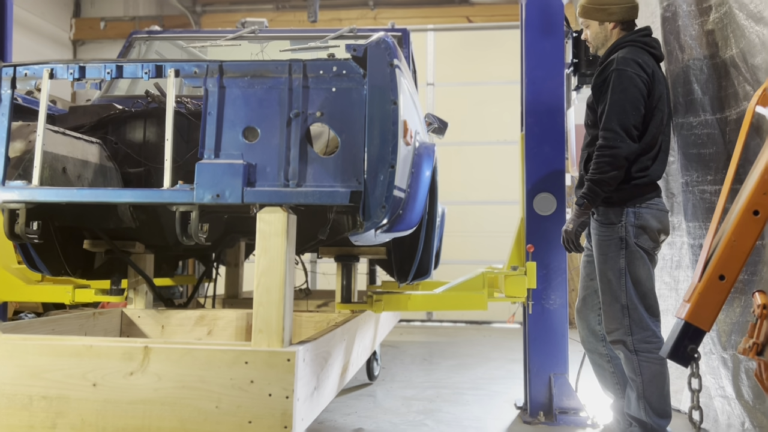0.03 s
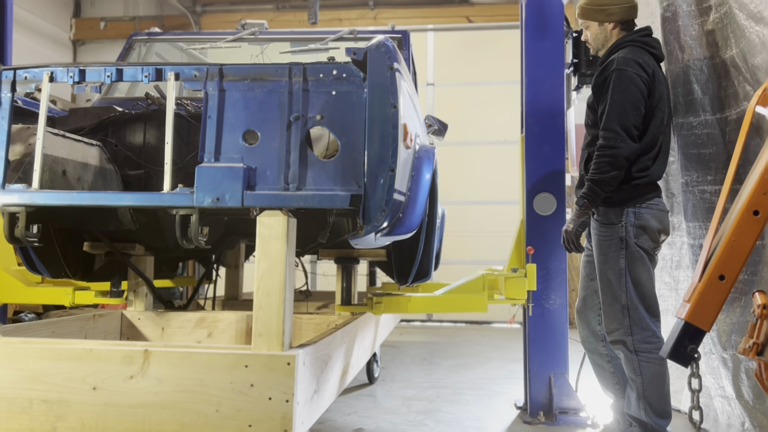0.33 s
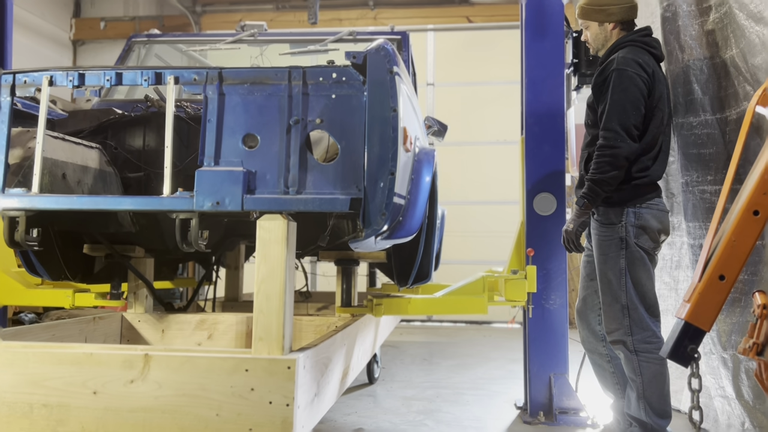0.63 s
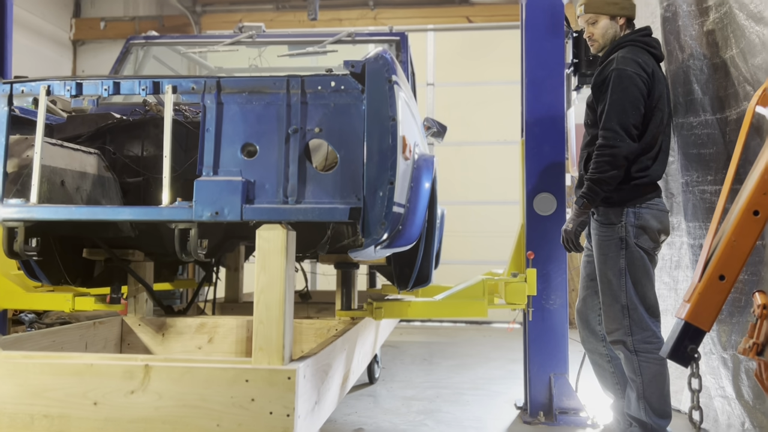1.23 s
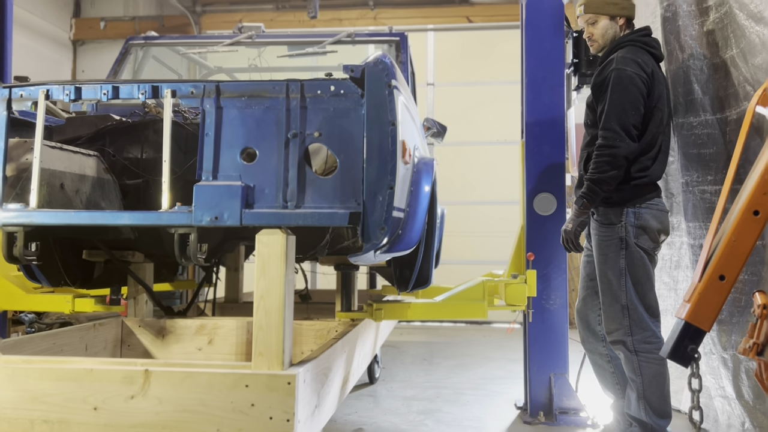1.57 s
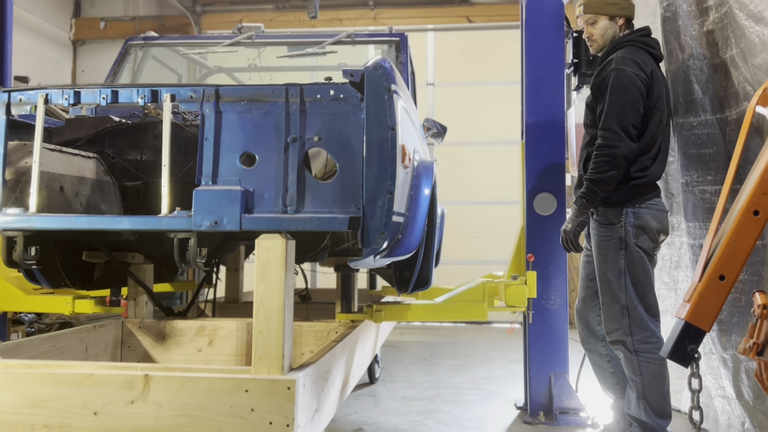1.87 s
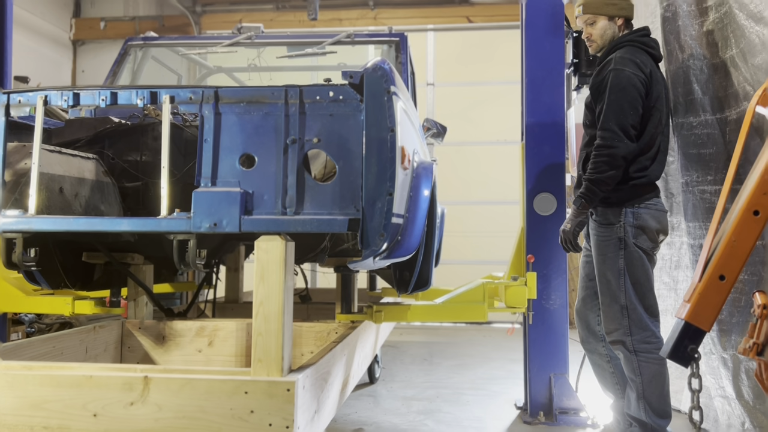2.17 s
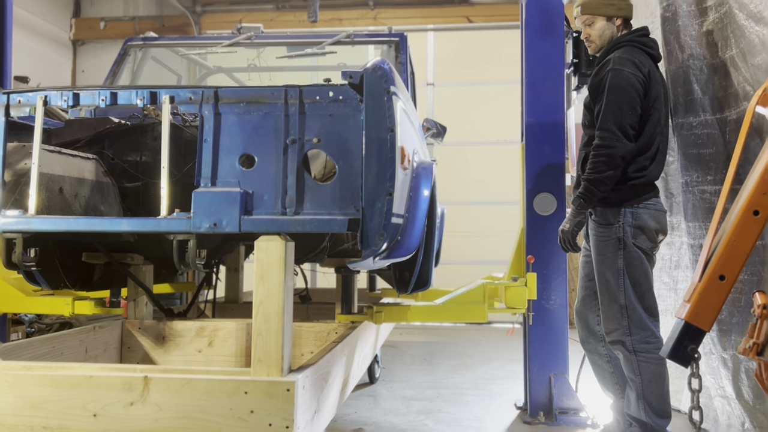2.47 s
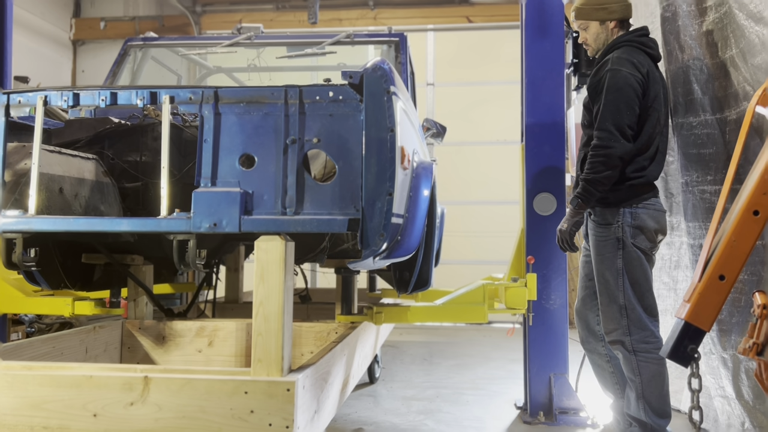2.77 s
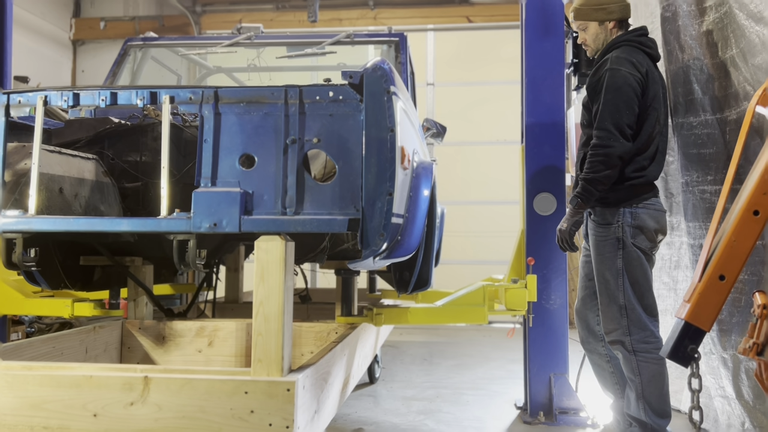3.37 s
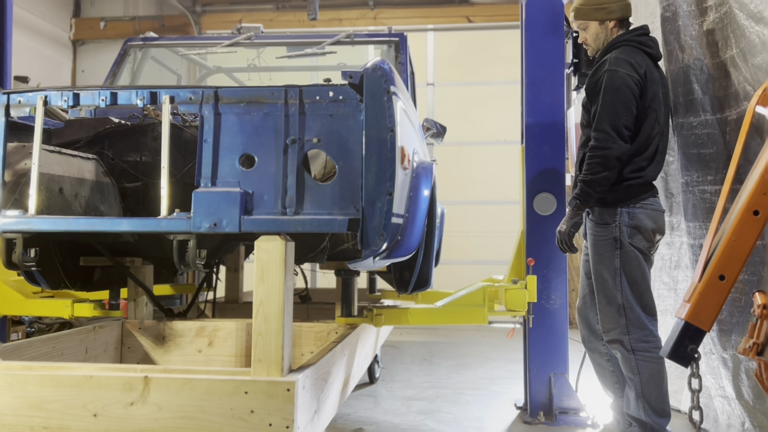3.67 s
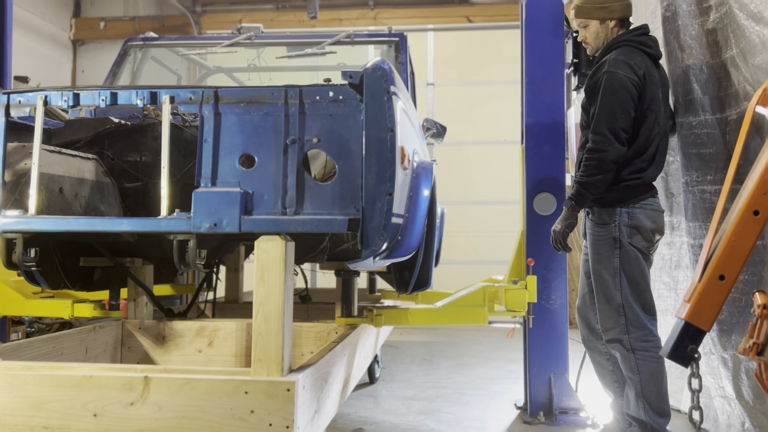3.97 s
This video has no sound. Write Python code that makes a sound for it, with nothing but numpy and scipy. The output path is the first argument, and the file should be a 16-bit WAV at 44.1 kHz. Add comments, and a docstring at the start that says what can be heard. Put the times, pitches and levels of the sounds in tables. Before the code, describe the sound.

Hollow metal knocks ring from a car shell shifting on its supports, mixed with timber creaks and small ticks. It lands on a wooden cart with two thumps over a low workshop rumble, before one sharp, nearby snap.

```python
"""Sharp steel knocks open the scene: a stripped car body, lowered on a workshop lift, slips on its
supports, and each impact excites the modes of its shell. The wooden cart beneath groans by stick-slip
friction and takes the weight in two dull thumps, the second with a rebound. Small fittings tick,
the shell creaks and the floor rumbles. Near the end something snaps close by, and the workshop rings on."""
import sys
import numpy as np
from scipy import signal
from scipy.fft import rfft, irfft, next_fast_len
from scipy.io import wavfile
from scipy.ndimage import uniform_filter1d

SR = 44100
rng = np.random.default_rng(int(sys.argv[2]) if len(sys.argv) > 2 else 0)


def digitize_waveform(pressure):
    """Quantize a signal to 16-bit integers and store it at the path in sys.argv[1].

    Rows of a 2-D input are taken as channels; values are limited to [-1, 1].
    """
    field = np.atleast_2d(pressure).T
    bounded = np.clip(field, -1, 1)
    quanta = np.round(bounded * 32767).astype(np.int16)
    wavfile.write(sys.argv[1], SR, quanta)


N = 176400
TIME = np.arange(N) / SR
RING_TIME = TIME[:SR]  # the one second given to each event

# spectral envelope of the steel shell's dense modes (frequency [Hz], relative level [dB])
SHELL_SPECTRUM = [(40, -36), (110, -13.5), (180, -0.5), (270, 1), (360, -1.5), (550, -0.5), (900, -6.5),
                  (1250, -10), (1420, -13), (1660, -16.5), (1850, -20), (2300, -24.5), (3300, -38.5),
                  (6000, -47.5), (11000, -58), (16000, -73)]


def amp(db):
    """Amplitude ratio of a level in decibels."""
    return 10 ** (np.asarray(db) / 20)


def unit(x):
    """Normalisation to unit RMS."""
    return x / np.sqrt(np.mean(x ** 2))


def decay(t60):
    """Exponential damping: 60 dB down after t60 seconds."""
    return np.exp(-np.log(1000) * RING_TIME / max(t60, 1e-3))


def rise(tau_s):
    """Exponential approach to full amplitude."""
    return 1 - np.exp(-RING_TIME / tau_s)


def envelope(points):
    """Amplitude envelope interpolated from (time [s], level [dB]) points."""
    return amp(np.interp(TIME, *np.array(points).T))


def add(out, start_s, x):
    """Superposition of x on out from start_s on."""
    i = max(int(start_s * SR), 0)
    out[i:i + len(x)] += x[:max(N - i, 0)]


def over_hz(points, hz):
    """Interpolation of (frequency [Hz], value) points on a logarithmic axis."""
    freqs, values = np.array(points, float).T
    return np.interp(np.log(hz + 1e-3), np.log(freqs), values)


def colour(x, spectrum, *tones):
    """Minimum-phase filtering by a spectrum scaled to unit power, times any further tone curves."""
    n = next_fast_len(len(x) + SR // 10, True) // 2 * 2
    hz = np.arange(n // 2 + 1) * SR / n
    gain = unit(amp(over_hz(spectrum, hz))) * amp(sum(over_hz(tone, hz) for tone in tones))
    cepstrum = irfft(np.log(gain))
    cepstrum[1:n // 2] *= 2  # folding onto positive time makes the filter causal
    cepstrum[n // 2 + 1:] = 0
    return irfft(rfft(x, n) * np.exp(rfft(cepstrum)))[:len(x)]


def whiten(x, width_hz):
    """Spectral whitening evens out the energy of a one-second response; its end is faded out."""
    spectrum = rfft(x)
    power = uniform_filter1d(abs(spectrum) ** 2, width_hz)
    return irfft(spectrum * np.sqrt(power.mean() / power)) * np.clip(4 - 5 * RING_TIME, 0, 1)


def resonate(x, hz, width):
    """Band-pass resonance; width is the approximate fractional bandwidth."""
    edges = np.clip([hz / (1 + width / 2), hz * (1 + width / 2)], 1, SR / 2 - 1)
    return signal.sosfilt(signal.butter(2, edges, "band", fs=SR, output="sos"), x)


def clatter(t60):
    """Modal overlap: countless crowded modes die away together as noise."""
    return whiten(rng.standard_normal(SR) * decay(t60), width_hz=121)


def modes(rows, scatter=0):
    """Free vibration as a sum of damped sines, with random phases of up to scatter cycles."""
    return sum(amp(db) * decay(t60) * np.sin(2 * np.pi * (hz * RING_TIME + scatter * rng.random()))
               for hz, db, t60 in rows)


def contact_tone(bass_db, treble_db):
    """Excitation spectrum of a contact: heavy ones bring out the bass, hard ones the treble."""
    return [(230, bass_db), (420, bass_db * 0.2), (760, 0.0092), (1150, treble_db * 0.38),
            (2300, treble_db), (9000, treble_db * 0.54), (13000, 0)]


def background():
    """Filtered noise gives floor rumble and still air; the loaded cart sways in one brief oscillation."""
    # spectra of floor and air (frequency [Hz], relative level [dB])
    floor_spectrum = [(10, -5.5), (24, 4), (45, -5.5), (68, -1.5), (100, -10), (150, -10.5), (260, -31),
                      (1000, -54.5)]
    air_spectrum = [(30, 2), (200, 10.5), (600, 10), (1500, 0.5), (3000, -1.5), (6000, -6), (9500, -6.5),
                    (12000, -9), (16000, -15.5)]
    # their envelopes (time [s], level [dB])
    floor_levels = [(0, -62.5), (.6, -53), (.9, -56), (1.3, -50), (1.99, -61.5), (2.09, -46), (2.35, -49.5),
                    (2.7, -50), (3.0, -56), (3.5, -60.5), (4, -55.5)]
    air_levels = [(0, -69.5), (1.2, -69), (1.8, -71.5), (3.6, -72.5), (4, -69)]
    sway_start_s, sway_length_s, sway_hz = 2.024, 0.19, 25
    out = colour(rng.standard_normal(N), floor_spectrum) * envelope(floor_levels)
    out += colour(rng.standard_normal(N), air_spectrum) * envelope(air_levels)
    swell = np.sin(np.pi * np.clip(RING_TIME / sway_length_s, 0, 1))
    add(out, sway_start_s, amp(-37) * np.sin(2 * np.pi * sway_hz * RING_TIME) * swell)
    return out


def workshop_reverb(x):
    """Reverberation: dense early reflections, then a diffuse tail that dies fastest in the top treble."""
    # reverberation time by band (frequency [Hz], t60 [s])
    bands = [(60, 0.6), (250, 0.97), (1000, 0.49), (2500, 0.94), (6000, .5), (14000, 0.12)]
    noise_spectrum, hz = rfft(rng.standard_normal(SR)), np.arange(SR // 2 + 1)
    response = amp(0.5) * rng.standard_normal(SR) * decay(0.28)  # early reflections
    for centre_hz, t60 in bands:
        share = over_hz([(f, f == centre_hz) for f, _ in bands], hz)
        response += irfft(noise_spectrum * share) * decay(t60)
    response = whiten(response * rise(0.004), width_hz=61)
    return signal.fftconvolve(x, response / np.sqrt(np.sum(response ** 2)))[:N]


def shell_creaking():
    """Tiny slips, a Poisson train of impulses, excite the shell while the load shifts."""
    # envelope of the creaking (time [s], level [dB])
    levels = [(0, -60), (.7, -48), (.95, -62), (1.15, -52), (1.45, -55), (1.7, -55.5), (1.85, -68),
              (2.0, -65), (2.15, -45.5), (2.45, -45.5), (2.75, -60), (3.1, -58.5), (3.45, -77.5),
              (3.8, -74.5), (4, -50)]
    slips_per_s = 160
    chance, size = rng.random(N), rng.standard_normal(N)
    slips = (chance < slips_per_s / SR) * (np.sign(size) + 0.33 * size)
    ringing = signal.fftconvolve(slips, clatter(0.11))[:N]
    creak = colour(ringing, SHELL_SPECTRUM, contact_tone(bass_db=6, treble_db=-7.5))
    return unit(creak) * envelope(levels)


def fitting_ticks():
    """Loose fittings tick and ping at high, damped resonances; returns direct sound and room feed."""
    # metal ticks (time [s], level [dB], centre [Hz], t60 [s], room feed [dB])
    ticks = [(0.504, -71.5, 9100, 0.26, -10), (.957, -69, 8200, 0.044, -3), (1.001, -71.5, 8600, 0.13, 4),
             (1.033, -67, 3340, 0.4, -8), (1.236, -53.5, 2980, 0.062, -8), (1.385, -57, 3770, .1, 0),
             (1.386, -56, 7900, 0.03, -2), (2.042, -69, 7900, 0.044, 0), (2.081, -67, 6130, 0.081, -10),
             (2.16, -41.5, 2780, 0.041, -21), (2.297, -66, 3800, 0.38, 5), (2.36, -54, 6600, .02, -6.5),
             (2.463, -60.5, 6500, 0.031, 2.5), (2.485, -69, 8800, 0.055, -2.5),
             (2.945, -71.5, 2580, 0.22, 0.5), (3.909, -50, 3300, .025, -6), (3.93, -56, 3500, .03, -8)]
    # modes of the fitting that pings (frequency [Hz], relative level [dB], t60 [s])
    ping_modes = [(5350, -2, 0.11), (5840, -6, 0.088), (7960, 0, 0.099), (8920, -3, 0.093),
                  (9250, -5, 0.11), (9460, 0, .16)]
    ping_s = 2.162
    direct, to_room = np.zeros(N), np.zeros(N)
    for start_s, db, hz, t60, room_db in ticks:
        tick = amp(db) * unit(resonate(rng.standard_normal(SR), hz, width=0.47)) * decay(t60)
        add(direct, start_s, tick)
        add(to_room, start_s, amp(room_db) * tick)
    ping_rms = amp(-55) * np.sqrt(np.mean(decay(0.18) ** 2))
    ping = ping_rms * unit(signal.fftconvolve(modes(ping_modes), clatter(0.014))[:SR])
    add(direct, ping_s, ping)
    add(to_room, ping_s, amp(-21) * ping)
    return direct, to_room


def timber_groans():
    """Stick-slip friction: uneven pulses drive one resonance of the timber for a moment."""
    # groans (time [s], duration [s], pitch [Hz], level [dB])
    groans = [(.392, 0.021, 813, -53.5), (.47, 0.2, 239.5, -53), (.55, .17, 142, -54),
              (.683, .045, 540.5, -45), (.69, 0.17, 234, -52.5), (1.15, 0.073, 277.5, -56),
              (1.517, 0.088, 559.8, -45.5), (1.572, 0.09, 272.4, -49), (1.58, 0.19, 540, -54.5),
              (1.50, 0.25, 202.8, -53.5), (2.06, 0.16, 193.4, -46), (2.219, .03, 784, -39.5),
              (2.416, 0.076, 887, -52), (2.595, 0.099, 192, -45.5), (2.616, 0.033, 1610, -60)]
    rate_jitter, scatter_db = 0.13, 3.5
    out = np.zeros(N)
    for start_s, length_s, hz, db in groans:
        unsteady = unit(uniform_filter1d(rng.standard_normal(SR), size=60))
        cycles = np.cumsum(hz * (1 + rate_jitter * unsteady)) / SR
        slips = np.diff(np.floor(cycles), prepend=0)  # one pulse a cycle
        slips *= amp(scatter_db * rng.standard_normal(SR))
        swell = np.sin(np.pi * np.clip(RING_TIME / length_s, 0, 1) ** 0.62)
        add(out, start_s, amp(db) * unit(resonate(slips, hz, width=0.34)) * swell)
    return out


def close_snap():
    """Two transients close by: a hard, heavily damped click, then a hollow thud that decays more slowly."""
    # spectra of click and thud (frequency [Hz], relative level [dB])
    click_spectrum = [(300, -18), (1000, -31), (2200, 4.5), (2800, -4), (3400, 3), (4100, -7.5),
                      (5300, 1.5), (6200, -6.5), (6700, 0.5), (7300, -15), (7950, 3), (8400, -2), (9000, 2),
                      (10000, -9), (10500, -8), (11100, -21), (16000, -32)]
    thud_spectrum = [(30, 6.5), (100, -5), (160, 8.5), (240, -10), (550, -1), (950, -19.5), (1300, -9.5),
                     (2200, -12), (2800, -23), (5000, -26), (12000, -55)]
    start_s, thud_lag_s = 3.8986, 0.005
    out = np.zeros(N)
    click = (clatter(0.012) + amp(-18.5) * clatter(0.05)) * rise(0.00084)
    add(out, start_s, amp(-25) * colour(click, click_spectrum))
    add(out, start_s + thud_lag_s, amp(-39) * colour(clatter(0.3), thud_spectrum))
    return out


def cart_thumps():
    """The load lands and rebounds, exciting the cart's modes; a deeper thump favours the low ones."""
    # landings (time [s], level [dB], pitch [Hz], depth [dB per octave below the pitch])
    landings = [(2.275, -28.5, 261, 4), (2.41, -24, 281.5, -4.5), (2.437, -34, 272, -25)]
    # modes of the timber frame (ratio to the pitch [1], level [dB], t60 [s])
    frame_modes = [(0.471, -7.5, 0.17), (.6, -10, 0.31), (.72, -4, .16), (1.002, -1.5, 0.26),
                   (1.2, -2, 0.1), (1.5, -11, .08), (1.76, -33, 0.098)]
    out = np.zeros(N)
    for start_s, db, hz, depth in landings:
        excited = [(hz * ratio, mode_db + depth * max(-np.log2(ratio), 0), t60)
                   for ratio, mode_db, t60 in frame_modes]
        add(out, start_s, amp(db) * modes(excited) * rise(0.0014))
    return out


def shell_knocks():
    """Impact excitation: each slip cracks and clatters through the shell; returns blows and panel ring."""
    # slips (time [s], level [dB], bass [dB], treble [dB], hollow ring [dB], clatter t60 [s])
    slips = [(.001, -39, 7, 10, 4.5, 0.16), (.055, -46, -12, 7, 5, .15), (.116, -51.5, 0, 0, 0, 0.23),
             (.143, -37, -1.5, -2.5, 3, .2), (.335, -56, 3.5, 0.5, -9, 0.41),
             (0.395, -49.5, -16, -4, -4, 0.038), (.449, -40, 7, 1.5, 0, 0.18),
             (0.524, -53.5, 10, -4, 5, 0.37), (.622, -50, -9, 4, 5.5, 0.085),
             (.637, -36, -8, -6.5, 0.5, 0.23), (.682, -41, 2, -25, 7, 0.14), (.839, -77, 6, -14, 0, 0.13),
             (1.027, -53, 3.5, 13, -3, 0.57), (1.156, -55.5, 12.5, -21, -5, 0.6),
             (1.2328, -31, -18, 1, 7.5, 0.21), (1.382, -55.5, -21, 16, -4, 0.13),
             (1.521, -50, -18, -22, -3, .22), (1.632, -62.5, 4, -5, 14, 0.063),
             (1.683, -53.5, 4, -26, -8, 0.21), (1.741, -63.5, -7, -5, 9, 0.16),
             (1.935, -59, 3, -28, -7, 0.053), (2.041, -54, 9, 7, -2, 0.12),
             (2.0638, -42.5, -4.5, -3, -5, 0.29), (2.16, -31, -18.5, 13, -1, 0.2),
             (2.2705, -44, -10, -10, -3, 0.11), (2.2774, -31.5, 0, -9.5, -3, 0.15),
             (2.409, -48.5, 9, -2, -1, .2), (2.507, -45.5, 7, -17, 0, 0.19), (2.575, -50, 1, -3, -5, 0.36),
             (2.813, -57, -5, -15, -8, .07), (3.032, -52.5, -5, -3.5, 1.5, 0.35),
             (3.181, -51, -11, -0.5, 0, 0.4), (3.197, -50, -7.5, -2, 0, 0.58),
             (3.813, -65.5, -11, 16, -5, 0.039)]
    # clearest panel modes (frequency [Hz], relative level [dB], t60 [s])
    panel_modes = [(234, -8.5, 0.35), (280.3, 1.5, 0.64), (424, -3, 0.46), (481.8, -4, 0.64),
                   (521, -7.5, 0.58), (632.5, -6, .55), (710.6, -5, 0.43), (819, -7, 0.53),
                   (899, -5.5, 0.49), (984, -7.5, 0.51), (1140, -22, 0.28), (1177, -10, 0.34),
                   (1240, -7.5, 0.38), (1505, -17.5, 0.3), (1643, -6.5, 0.23)]
    # hollow resonance of a slip (frequency [Hz], multiplier of its hollow ring level [1])
    hollow_shape = [(750, 0), (900, 0.28), (1200, 0.16), (1500, 1.07), (1760, 0.95), (1950, .2),
                    (2400, -.5), (3150, 0.7), (3900, 0)]
    blows, rings = np.zeros(N), np.zeros(N)
    attack = rise(0.0021)
    for start_s, db, bass_db, treble_db, hollow_db, clatter_t60 in slips:
        tone = contact_tone(bass_db, treble_db)
        hollow = [(hz, hollow_db * share) for hz, share in hollow_shape]
        body = clatter(clatter_t60) * attack
        crack = amp(-1) * clatter(0.058)
        add(blows, start_s, amp(db) * colour(body + crack, SHELL_SPECTRUM, tone, hollow))
        excited = [(hz, mode_db + over_hz(tone, hz) + over_hz(hollow, hz) / 2, t60)
                   for hz, mode_db, t60 in panel_modes]
        panels = modes(excited, scatter=0.98)  # phases vary with the point of contact
        add(rings, start_s, amp(db - 7) * panels * attack ** 2)
    return blows, rings


def scene():
    """Superposition of direct sound, reverberant field and background, in mono."""
    blows, rings = shell_knocks()
    thumps, groans, snap = cart_thumps(), timber_groans(), close_snap()
    ticks, ticks_to_room = fitting_ticks()
    to_room = amp(-4.5) * blows + amp(-7.5) * thumps + amp(-8.5) * groans + amp(-10.5) * snap
    reverb = workshop_reverb(to_room + ticks_to_room)
    direct = amp(0.5) * blows + rings + thumps + groans + ticks + snap + shell_creaking()
    return (direct + reverb + background())[None]


def record(dry):
    """Band limiting: a steep elliptic low-pass removes the highest treble."""
    cutoff_hz = 15600
    return signal.sosfilt(signal.ellip(8, .2, 70, cutoff_hz, fs=SR, output="sos"), dry)


dry = scene()
out = record(dry)
digitize_waveform(out)
```